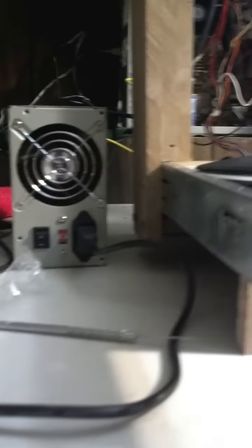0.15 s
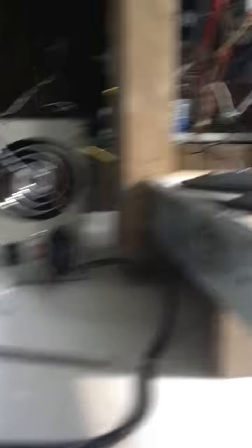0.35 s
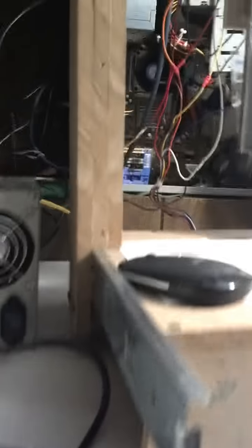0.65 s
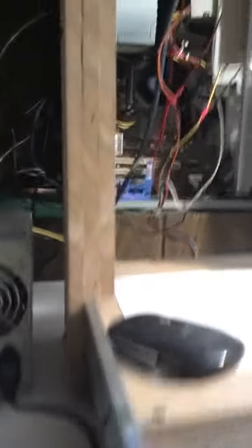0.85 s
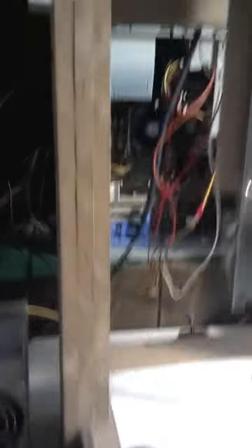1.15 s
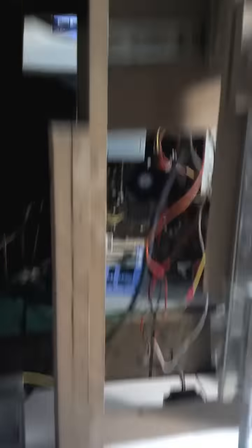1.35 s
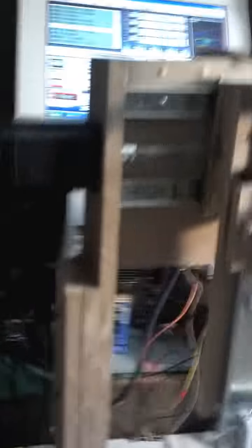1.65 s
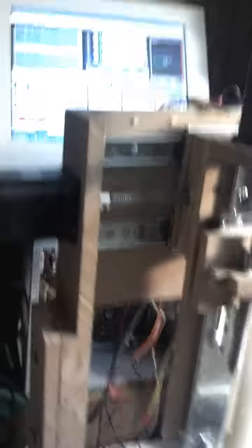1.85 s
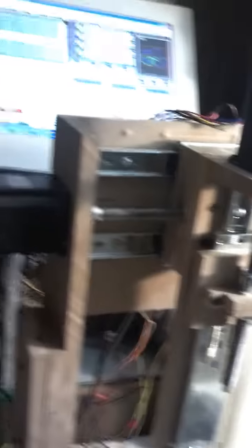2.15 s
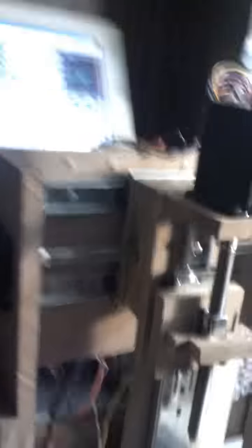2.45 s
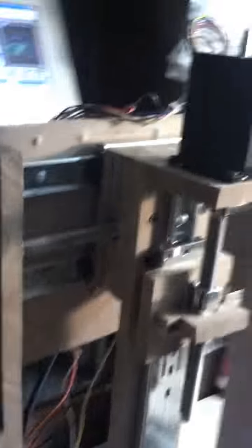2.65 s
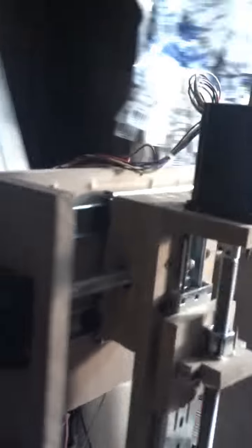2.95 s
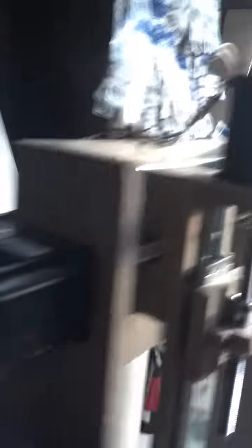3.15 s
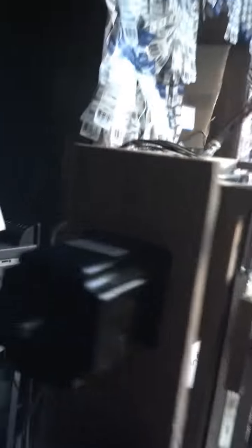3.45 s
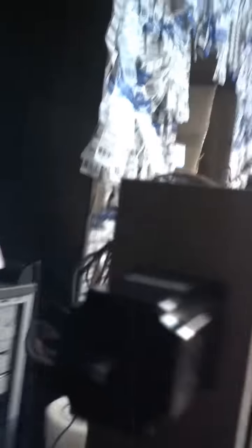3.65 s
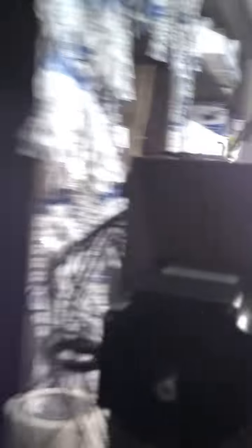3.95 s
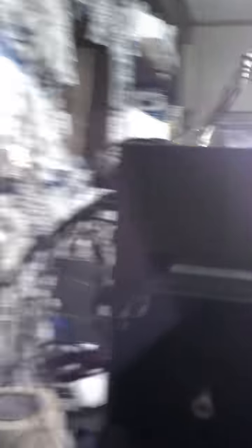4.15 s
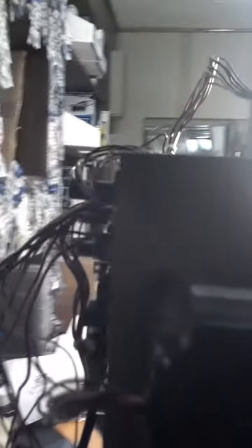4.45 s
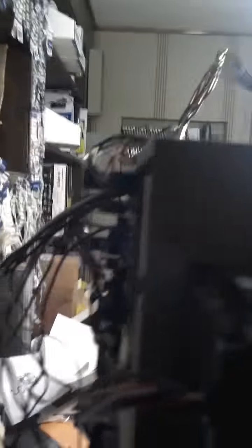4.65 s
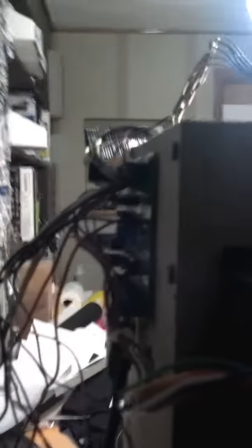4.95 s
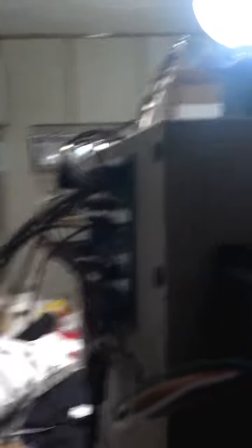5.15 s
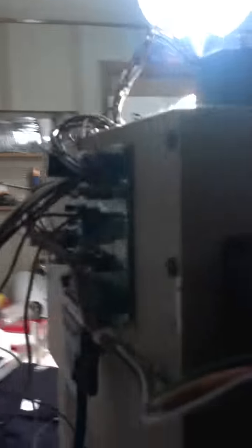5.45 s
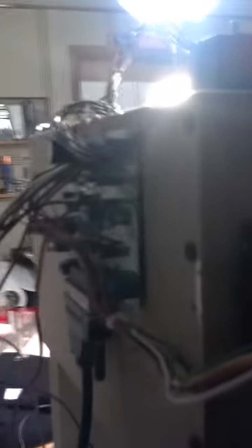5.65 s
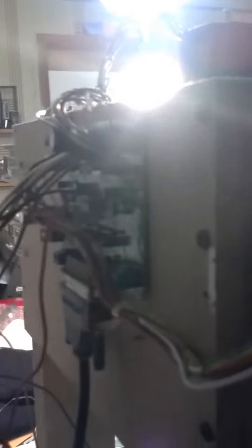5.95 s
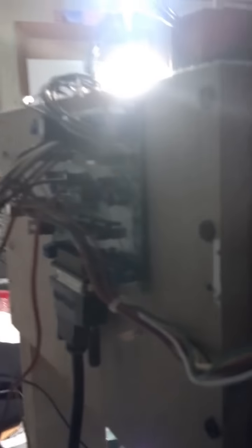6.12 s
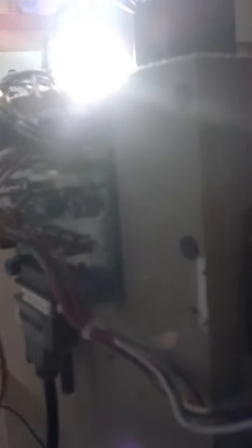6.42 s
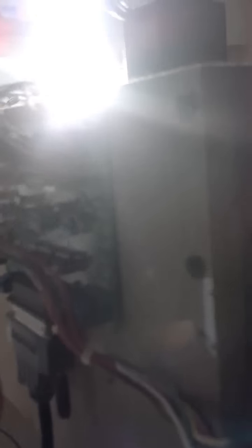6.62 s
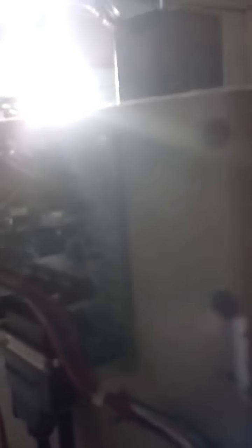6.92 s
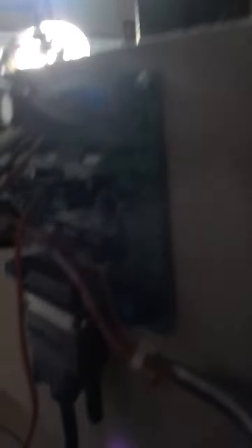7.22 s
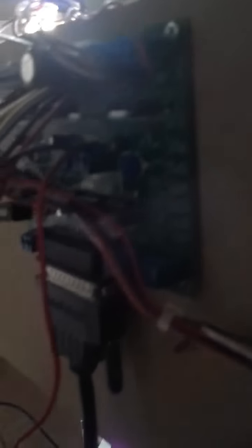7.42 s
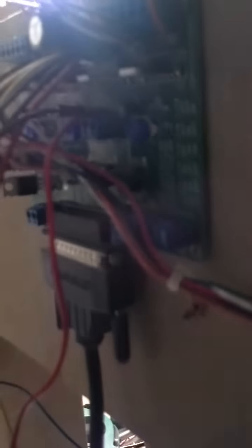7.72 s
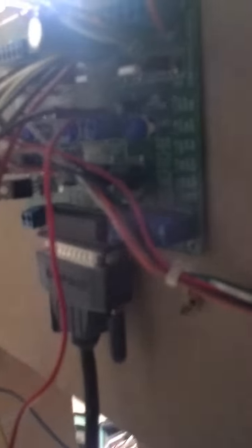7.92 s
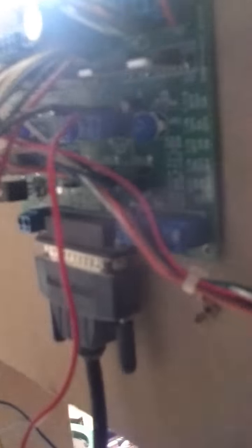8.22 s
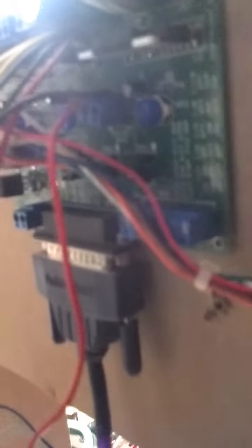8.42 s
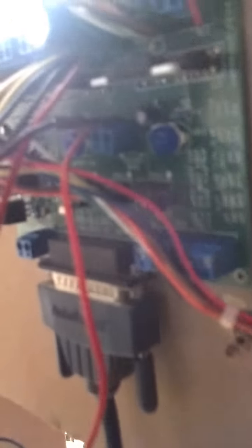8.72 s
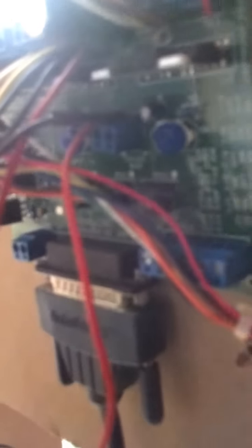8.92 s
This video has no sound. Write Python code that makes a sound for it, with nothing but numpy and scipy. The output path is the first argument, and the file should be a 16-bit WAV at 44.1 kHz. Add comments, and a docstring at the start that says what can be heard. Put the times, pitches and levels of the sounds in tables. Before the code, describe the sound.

Stepper motors on a small wooden machine, heard near by with short, dry room reflections. One quiet steady run with gritty rubbing, then a strong rising whine, long cruise and falling slide, then a return run broken by piercing squeals near its middle. A brief whine follows, a lumpy judder, and stepped two-motor tones while fan and hiss grow louder.

```python
"""Small wooden milling machine with three stepper motors, heard from a hand-held stereo camera.
X runs out and a resonance squeals; Y whines up, cruises and slows; X runs back amid more squeals, then makes
a short move out; finally Y and Z share a curved path. Motor tones are orders of the step rate, shaped by
resonances. The frame rings, rattles, shudders and judders; slides rub and scrape, X more so on a dry spot: all
shaped noise. Squeals are wavering tones near 1.8 kHz. Driver hiss and power-supply fan and hum run throughout."""
import sys
import numpy as np
from scipy import signal
from scipy.fft import rfft, irfft
from scipy.io import wavfile
from scipy.ndimage import uniform_filter1d

SR = 44100
rng = np.random.default_rng(int(sys.argv[2]) if len(sys.argv) > 2 else 0)


def output_pcm(signal):
    """Save a mono or channel-first signal as 16-bit PCM at the path in sys.argv[1].

    Samples are clipped to [-1, 1] before scaling.
    """
    pcm = np.clip(np.atleast_2d(signal).T, -1, 1) * 32767
    wavfile.write(sys.argv[1], SR, np.round(pcm).astype(np.int16))


N = 400428
TIME, FREQS = np.arange(N) / SR, np.fft.rfftfreq(N, 1 / SR)


def amp(db):
    """Decibels to gain."""
    return 10 ** (np.asarray(db) / 20)


def unit(x):
    """Scales to rms 1."""
    return x / np.sqrt(np.mean(x ** 2) + 1e-20)


def together(*gains):
    """Gain of unrelated causes sounding at once: powers add."""
    return np.sqrt(sum(gain ** 2 for gain in gains))


def curve(rows):
    """Control curve at every sample, linear between rows."""
    return np.interp(TIME, *np.transpose(rows))


def read(points, hz):
    """Reads a spectrum on a log-frequency axis."""
    point_hz, value = np.transpose(points)
    return np.interp(np.log(hz + 1), np.log(point_hz + 1), value)


def drift(band_hz, times=TIME):
    """Slow random signal of rms 1, limited to band_hz."""
    knots = signal.resample(rng.standard_normal(4096), 4096 * 8)
    return np.interp(times * band_hz * 16, np.arange(len(knots)), knots)


def noise():
    """White noise for each port."""
    return rng.standard_normal((2, N))


# lead of the right microphone port: freq_hz, lead_samples
PORT_LEAD = [(160, 10.6), (600, 1.1), (1300, 7.86), (1900, 3.8)]


def ports(turns, gain, hz):
    """A tone of rms gain at both ports, half the lead to each side."""
    half_rad = np.pi * hz * read(PORT_LEAD, hz) / SR
    phase_rad = 2 * np.pi * turns
    return np.sqrt(2) * gain * np.sin(np.array([phase_rad - half_rad, phase_rad + half_rad]))


# likeness of the two ports: freq_hz, coherence
PORT_COHERENCE = [(100, 0.96), (700, 0.6), (1300, 0.064), (2200, 0.046), (4000, 0.12)]


def coloured(pair, colour):
    """Two unrelated signals become one coloured stereo sound, alike at both ports in the bass."""
    left, other = rfft(pair) * amp(read(colour, FREQS))
    same = np.clip(read(PORT_COHERENCE, FREQS), 0, 1)
    advance = np.exp(2j * np.pi * FREQS * read(PORT_LEAD, FREQS) / SR)
    right = (same * left + np.sqrt(1 - same ** 2) * other) * advance
    return unit(irfft([left, right], N))


TOP_RATE_HZ, ACCEL_HZ_PER_S = 1279, 2558  # full steps
# single moves: start_s, stop_s, direction
X_MOVES = [(-.39, 2.13, 1), (4.855, 7.19, -1), (7.355, 7.995, 1)]
Y_MOVES = [(2.135, 4.855, 1)]


def travel(moves):
    """Signed step rate of single moves: ramp up, cruise, ramp down."""
    rate_hz = np.zeros(N)
    for start_s, stop_s, direction in moves:
        ramp_s = np.minimum(TIME - start_s, stop_s - TIME)
        rate_hz += direction * np.clip(ACCEL_HZ_PER_S * ramp_s, 0, TOP_RATE_HZ)
    return rate_hz


# path stretches: start_s, feed_z_steps_per_s, y_motor_db, z_motor_db, rattle_db
PATH = [(7.68, 2130, -20, -34, -32), (7.84, 1676, -29, -23.5, -39.5), (8.01, 2240, -21, -21.5, -40),
        (8.23, 1707, -27.5, -20, -42.5), (8.378, 1556, -15.5, -23, -40.5), (8.54, 1658, -20, -17.5, -47.5),
        (8.711, 1638, -19.5, -22, -50), (8.884, 1610, -22, -21, -38), (9.032, 1680, -26, -23.5, -50)]
# path direction: time_s, from_y_towards_z_deg
HEADING = [(7.83, 14.5), (8.01, 24), (8.23, 26.2), (8.39, 30.5), (8.54, 38.5), (8.71, 51.33),
           (8.885, 51.33), (9.09, 65.8)]
FEED_ACCEL_HZ_PER_S, Y_STEPS_PER_Z_STEP = 10700, .25  # feed in Z steps


def path_rates():
    """The feed ramps to each stretch's value; the heading shares it between Y and Z."""
    starts_s, feeds_hz = np.transpose(PATH)[:2]
    feed_hz = np.zeros(N)
    for start_s, change_hz in zip(starts_s, np.diff(feeds_hz, prepend=0)):
        ramp_hz = np.clip((TIME - start_s) * FEED_ACCEL_HZ_PER_S, 0, abs(change_hz))
        feed_hz += np.sign(change_hz) * ramp_hz
    heading_rad = np.radians(curve(HEADING))
    return Y_STEPS_PER_Z_STEP * feed_hz * np.cos(heading_rad), feed_hz * np.sin(heading_rad)


def path_loads(blend_s=0.1):
    """Y motor, Z motor and rattle levels, held through each stretch and blended between."""
    starts_s, _, *levels_db = np.transpose(PATH)
    stretch = np.maximum(np.searchsorted(starts_s, TIME) - 1, 0)
    return uniform_filter1d(np.array(levels_db)[:, stretch], round(blend_s * SR))


def motor(hz, level_db, orders, body, waver_db, jitter_turns, ripple_db=6.0, inertia_db=14,
          chatter_db=1, chatter_hz=400, grind_db=11.0):
    """Orders of the step rate, each as loud as the frame responds at its present frequency."""
    on = hz > 0
    rate_hz, on_s = hz[on], TIME[on]
    # the rotor hunts around its commanded position
    turns = (np.cumsum(hz) / SR + jitter_turns * drift(70))[on]
    slow = np.exp(-rate_hz / chatter_hz)
    gain = (amp(level_db) * np.clip(hz / 90, 0, 1))[on]
    gain = gain * amp(chatter_db * slow * drift(55)[on])  # slow steps come unevenly
    # dense high modes make the glides uneven
    grid_hz = np.arange(0, SR / 2, 110)
    ripple = ripple_db * rng.standard_normal(len(grid_hz)) * (grid_hz > 2100)
    tones = np.zeros((2, len(turns)))
    for order, order_db in orders:
        order = round(order * 64) / 64 if order < 2 else round(order)
        tone_hz = order * rate_hz
        response_db = read(body, tone_hz) + np.interp(tone_hz, grid_hz, ripple)
        response_db += waver_db * drift(9, on_s) + grind_db * slow * drift(80, on_s)
        # at speed the rotor's inertia evens out the cogging
        smoothing_db = inertia_db * (order > 3) * np.clip((rate_hz - 560) / 400, 0, 1)
        order_gain = gain * amp(order_db + response_db - smoothing_db)
        tones += ports(order * turns + rng.random(), order_gain, tone_hz)
    whole = np.zeros((2, N))
    whole[:, on] = tones
    return whole


# level as the camera passes the motor: time_s, level_db
Y_LEVEL = [(2.2, -21.5), (2.5, -25.5), (2.8, -26.5), (3.13, -20.5), (3.45, -17.5), (4, -19), (4.35, -19.5),
           (4.72, -20)]
# vibration: step_rate_multiple, relative_db
Y_ORDERS = [(.125, 0), (.25, 0), (1, -1.5), (2, -20), (3, -17), (4, -1), (6, -17), (8, -6), (12, -7.5),
            (16, -10), (20, -10)]
# frame radiation: freq_hz, response_db
Y_BODY = [(60, -39), (160, -9.5), (250, -21), (320, -18.5), (420, -21), (490, -14), (680, -8.5), (850, -14),
          (980, -7), (1160, -7.5), (1310, 2.5), (1550, -5.5), (2000, -6), (2500, -17.5), (3500, -17),
          (4100, -17), (5500, -35)]


def y_motor(hz, on_path, path_db):
    """Y stepper: orders levelled by the camera on single moves, by the stretch on the path."""
    level_db = np.where(on_path, path_db, curve(Y_LEVEL))
    return motor(hz, level_db, Y_ORDERS, Y_BODY, waver_db=1.6, jitter_turns=0.0057,
                 chatter_db=1.5, grind_db=1.5, inertia_db=15)


# level as the camera passes the motor: time_s, level_db
X_LEVEL = [(0, -44), (.12, -37), (.7, -37.5), (.85, -35), (1.2, -23.5), (1.75, -30), (5.2, -26), (7.5, -26)]
# vibration and cogging: step_rate_multiple, relative_db
X_ORDERS = [(.25, -1.5), (.5, 0), (1, 7)]
X_COGGING = [(4, 8), (8, 1), (12, -1)]
# radiation of frame and motor mount: freq_hz, response_db
X_BODY = [(120, -17), (300, -29), (430, -26), (540, -12), (690, -19), (800, -12.5), (915, 3), (1020, -8),
          (1150, -26.5), (1290, -23.5)]
X_MOUNT = [(250, -27), (550, -13), (750, -19), (910, -6), (1130, -24), (1400, -22), (1900, -28),
           (3600, -33), (5000, -47)]


def x_motor(hz):
    """X stepper: low orders leave through the frame, cogging through the mount."""
    level_db = curve(X_LEVEL)
    low_orders = motor(hz, level_db, X_ORDERS, X_BODY, waver_db=-0.6, jitter_turns=.004)
    cogging = motor(hz, level_db, X_COGGING, X_MOUNT, waver_db=-1.0, jitter_turns=0.0034, grind_db=6.5)
    return low_orders + cogging


# vibration: step_rate_multiple, relative_db
Z_ORDERS = [(.125, -9.5), (.25, -8), (.5, -16.5), (1, 3.5), (2, -0.5), (3, -6), (4, -1.5), (5, 1.5)]
# frame radiation: freq_hz, response_db
Z_BODY = [(70, -23), (110, 9), (170, -15.5), (240, -1), (330, -10), (550, -19.5), (640, -11), (720, -37),
          (820, -14), (960, -6), (1090, -7), (1145, -6), (1200, -11), (1380, 0.5), (1500, -5), (1640, -5),
          (1950, -8), (2400, -16.5), (3800, -21), (6000, -48)]


def z_motor(hz, level_db):
    """Z stepper: orders of its step rate through its own frame response."""
    return motor(hz, level_db, Z_ORDERS, Z_BODY, waver_db=2, jitter_turns=0.0077, grind_db=5, inertia_db=8)


def resonance(hz, width_hz):
    """Frequency response of one mode, gain 1 at its centre."""
    return 1 / (1 + 2j * (FREQS - hz) / width_hz)


# side tones near top speed: step_rate_multiple, relative_db
Y_SIDE_TONES = [(.75, -28), (.781, -34), (.844, -27.5), (.875, -22), (1.078, -21), (1.25, -35), (1.5, -31)]
# drive resonance just above the top rate: centre_hz, width_hz, relative_db
Y_DRIVE_MODE = (1303, 89, -15)


def cruise_buzz(hz, reach_hz=210, waver_db=2):
    """Near top speed the Y rotor swings: side tones join; uneven steps stir the drive's resonance."""
    on = hz > 0
    centre_hz, width_hz, ring_db = Y_DRIVE_MODE
    stirred = rfft(rng.standard_normal(N)) * resonance(centre_hz, width_hz) ** 2
    half_rad = np.pi * FREQS * read(PORT_LEAD, FREQS) / SR
    buzz = amp(ring_db) * unit(irfft(stirred * np.exp(1j * np.array([-half_rad, half_rad])), N))
    turns = np.cumsum(hz[on]) / SR
    for order, tone_db in Y_SIDE_TONES:
        order = round(order * 64) / 64
        gain = amp(tone_db + waver_db * drift(9, TIME[on]))
        buzz[:, on] += ports(order * turns + rng.random(), gain, order * hz[on])
    near_top = np.exp(-((hz - TOP_RATE_HZ) / reach_hz) ** 2)
    return buzz * amp(curve(Y_LEVEL)) * near_top


# ringing modes: centre_hz, width_hz, relative_db
FRAME_MODES = [(366, 13, -1.5), (674, 14, 1), (938, 49, 1.5), (1078, 13, 1.5), (1387, 38, -5.5),
               (1576, 65, -0.5), (1994, 8.3, -2.5), (3690, 47, -2)]


def frame(x):
    """The frame's modes ring along with what shakes it and beat against passing glides."""
    ringing = sum(amp(db) * resonance(hz, width_hz) for hz, width_hz, db in FRAME_MODES)
    return irfft(rfft(x) * (1 + ringing), N)


def room(x, t60_s=0.24):
    """Sparse reflections that die quickly, as in a small workshop."""
    age_s = np.arange(SR // 2) / SR
    shape = (2, len(age_s))
    sparse = rng.standard_normal(shape) * (rng.random(shape) < 2000 / SR)
    taps = sparse * (age_s > .003) * amp(-60 * age_s / t60_s)
    taps = taps + .5 * taps[::-1]
    return signal.fftconvolve(x, taps / np.linalg.norm(taps[0]), axes=1)[:, :N]


def panels(x, hz, share=.6, slow_hz=900, t60_s=.09):
    """Speed changes rack the frame: dense panel modes ring, breaking up and blurring the sweeps."""
    strain = np.clip(abs(np.gradient(hz)) * SR / ACCEL_HZ_PER_S, 0, 1) * np.exp(-(hz / slow_hz) ** 4)
    wet = np.clip(share * uniform_filter1d(strain, size=900), 0, 1)
    return np.sqrt(1 - wet ** 2) * x + room(wet * x, t60_s)


# squeals of a resonance: peak_s, level_db, rise_s, fade_db_per_s, pitch_hz
SQUEALS = [(1.959, -22.5, .008, 230, 1797), (4.947, -36, .01, 306, 1819), (5.045, -26.5, .01, 70, 1819),
           (5.875, -22.5, .025, 34, 1813), (5.8, -31, .06, 60, 1819), (5.923, -20, .007, 500, 1822),
           (6.014, -15, .004, 230, 1815), (6.175, -26.5, .0097, 111, 1809), (7.535, -31, .0032, 110, 1820)]
SQUEAL_OCTAVE_DB = -13  # against the tone, at the loudest squeal


def squeal(wander_hz=4, flutter_db=2.95, octave_flutter_db=4):
    """A resonance near 1.8 kHz rings out, at each squeal's own pitch, as X's motor tones sweep past it
    or the slide catches; hard squeals burst into the octave."""
    gains = []
    for peak_s, level_db, rise_s, fade_db_per_s, _ in SQUEALS:
        fade = amp(level_db - fade_db_per_s * np.maximum(TIME - peak_s, 0))
        gains.append(fade * np.exp(-(np.minimum(TIME - peak_s, 0) / rise_s) ** 2))
    gains = np.array(gains)
    pitches_hz = np.transpose(SQUEALS)[-1][:, None] * np.ones(N)
    hz = np.average(pitches_hz, axis=0, weights=gains + 1e-12)
    turns = np.cumsum(hz + wander_hz * drift(45)) / SR
    strength = gains.sum(0)
    gain = strength * amp(flutter_db * drift(40))
    octave = gain * strength / strength.max() * amp(SQUEAL_OCTAVE_DB + octave_flutter_db * drift(50))
    return ports(turns, gain, hz) + ports(2 * turns, octave, 2 * hz)


def shudder(hz, cruise_db, slow_db, slow_hz, settle_s=0.052):
    """A motor shakes the frame most when steps are slow and separate; it settles after a stop."""
    drive = np.clip(hz / 12, 1e-4, 1) * amp(cruise_db + slow_db * np.exp(-hz / slow_hz))
    fall = TIME / settle_s
    return np.exp(np.maximum.accumulate(np.log(drive) + fall) - fall)


RATTLE_REST_DB, RATTLE_X_DB, RATTLE_Y_DB, RATTLE_DRY_DB = -44.5, -40.5, -38.5, -46


def frame_shake(x_hz, y_hz, on_path, path_rattle_db, dry_spot):
    """Rattle drive: rest level, dry spot and the shudder of X and Y."""
    x_shake = shudder(x_hz, RATTLE_X_DB, slow_db=7.5, slow_hz=533)
    y_cruise_db = np.where(on_path, path_rattle_db, RATTLE_Y_DB)
    y_shake = shudder(y_hz, y_cruise_db, slow_db=10.5, slow_hz=470)
    return together(amp(RATTLE_REST_DB), amp(RATTLE_DRY_DB) * dry_spot, x_shake, y_shake)


# rattle spectrum: freq_hz, relative_db
RATTLE_COLOUR = [(40, -26), (80, 2), (250, 8.5), (400, 1.5), (650, -1.5), (950, -4), (1350, -8.5),
                 (2000, -10.5), (2400, -8.5), (6000, -36.5), (16000, -42.5)]


def rattle(y_hz, shake, spread_db=3, ring_s=0.01, wash=0.42, throb_db=2.5):
    """Loose parts tap about once in eight steps of the heavy Y axis, and at random besides."""
    beats = np.cumsum(y_hz) / SR / 8 + .08 * drift(60)
    step_taps = (np.diff(np.floor(beats), prepend=0) > 0) * (y_hz > 0)
    taps = step_taps | (rng.random(N) < 130 / SR)  # 130 random taps per second
    sizes = taps * amp(spread_db * np.clip(rng.standard_normal(N), -2, 2))
    bursts = unit(signal.lfilter([1], [1, -np.exp(-1 / (ring_s * SR))], sizes))
    moving = np.clip(y_hz / 200, .35, 1)
    clatter = coloured(noise() * (wash + moving * bursts), RATTLE_COLOUR)
    return clatter * shake * amp(throb_db * drift(13))


# rub spectrum: freq_hz, relative_db
RUB_COLOUR = [(500, -31), (1800, 2.5), (2700, -4), (3400, -3.5), (4100, -1), (5200, -7), (7000, -13.5),
              (16000, -20.5)]
RUB_X_DB, RUB_Y_DB, RUB_Z_DB, RUB_DRY_DB = -49, -48, -49, -44  # axes at TOP_RATE_HZ


def slides(x_hz, y_hz, z_hz, dry_spot, grain_db=1.5, speed_power=0.098):
    """Ball slides rub with a fine grain, louder with speed and on the dry spot."""
    axes = [(x_hz, RUB_X_DB), (y_hz, RUB_Y_DB), (z_hz, RUB_Z_DB)]
    gains = [amp(db) * (hz / TOP_RATE_HZ) ** speed_power for hz, db in axes]
    rub = coloured(noise() * amp(grain_db * drift(160)), RUB_COLOUR)
    return rub * together(*gains, amp(RUB_DRY_DB) * dry_spot)


# catches: start_s, length_s, dull_db, bright_db
SCRAPES = [(0.617, 0.032, -37.5, -35), (0.789, 0.064, -37, -34), (0.937, 0.066, -38, -37),
           (1.114, 0.097, -35, -36), (1.17, 0.19, -42, -38), (1.86, 0.4, -43, -46), (2.139, 0.16, -40, -48),
           (4.132, 0.031, -21.5, -37), (4.301, 0.022, -26.5, -36), (4.839, 0.064, -32.5, -63),
           (5.686, 0.28, -34.5, -43.5), (5.756, 0.048, -35, -34.5), (5.85, 0.079, -45.5, -37),
           (5.913, 0.013, -43, -19), (6.01, 0.024, -39.5, -23.5), (6.152, 0.016, -30.5, -38),
           (6.165, 0.17, -38.5, -42.5), (7.359, 0.014, -33.5, -59), (7.884, 0.048, -24, -44)]
# spectra of the two parts: freq_hz, relative_db
DULL_COLOUR = [(50, -23), (180, -17), (400, 6.5), (750, 5), (1200, -2.5), (1900, 3), (2600, -16),
               (8000, -44)]
BRIGHT_COLOUR = [(1000, -22), (2000, 4.5), (3700, 2.5), (4400, 0.5), (5500, -9), (7000, -8.5), (16000, -41)]
# one sharp click: time_s, level_db
SNAP = (2.4265, -23)


def scrapes(grain_db=3, snap_s=0.006, attack_s=0.0043):
    """Short gritty catches with a dull and a bright part, and one sharp click."""
    dull, bright = np.zeros((2, N))
    for start_s, length_s, dull_db, bright_db in SCRAPES:
        age_s = np.maximum(TIME - start_s, 0)
        shape = np.minimum(age_s / attack_s, 1) * np.exp(-(age_s / length_s) ** 2)
        dull += amp(dull_db) * shape
        bright += amp(bright_db) * shape
    grit = amp(grain_db * drift(200))
    click_s, click_db = SNAP
    snap = amp(click_db) * (TIME >= click_s) * np.exp(-abs(TIME - click_s) / snap_s) * noise()
    dull_part = dull * coloured(noise() * grit, DULL_COLOUR)
    bright_part = bright * coloured(noise() * grit, BRIGHT_COLOUR)
    return dull_part + bright_part + snap


# judders as an axis changes speed: start_s, length_s, level_db
JUDDERS = [(2.157, 0.066, -23.5), (4.838, 0.04, -24), (8.083, 0.046, -15)]
# judder spectrum: freq_hz, relative_db
JUDDER_COLOUR = [(60, -34), (130, 15), (300, 6.5), (600, -1), (1000, -10), (4000, -57)]


def judders(attack_s=0.0064, grain_db=3):
    """Short, lumpy rumbles of the whole frame."""
    gain = np.zeros(N)
    for start_s, length_s, level_db in JUDDERS:
        age_s = np.maximum(TIME - start_s, 0)
        gain += amp(level_db) * np.minimum(age_s / attack_s, 1) * np.exp(-(age_s / length_s) ** 2)
    return gain * coloured(noise() * amp(grain_db * drift(90)), JUDDER_COLOUR)


# driver hiss as the camera moves about: time_s, level_before_hiss_db
HISS_LEVEL = [(0, -54), (.72, -52), (.95, -43), (1.9, -46.5), (2.3, -57), (3.5, -54.5), (3.8, -50),
              (4.55, -43), (4.95, -53), (6.15, -55.5), (6.9, -49), (7.55, -54), (7.8, -41.5), (9, -39.5)]
# hiss spectrum: freq_hz, relative_db
HISS_COLOUR = [(7000, -15), (11500, -14.5), (12800, -6.5), (14800, -6.5), (15700, 1)]
# whistles while an axis cruises: start_s, end_s, pitch_hz, level_db
WHISTLES = [(2.63, 4.36, 9911, -65), (5.35, 6.69, 15000, -62)]


def motor_drivers(hiss_db=7.0, flicker_db=2):
    """Driver electronics: flickering high hiss and fine gated whistles."""
    out = coloured(noise(), HISS_COLOUR) * amp(hiss_db + curve(HISS_LEVEL) + flicker_db * drift(3.4))
    for start_s, end_s, hz, level_db in WHISTLES:
        gate = np.clip(np.minimum(TIME - start_s, end_s - TIME) / .02, 0, 1)
        out += ports(hz * TIME, gate * amp(level_db + 2 * drift(5.2)), hz)
    return out


# fan air spectrum: freq_hz, relative_db
FAN_COLOUR = [(70, -6.5), (115, 23.5), (170, -15), (260, -4), (500, -34), (950, -27), (1800, -12.5),
              (8000, -46.5), (16000, -23.5)]
# fan level: time_s, level_db
FAN_LEVEL = [(0, -48), (6.3, -45.5), (7.3, -38.5), (9, -34)]
# hum: pitch_hz, level_db
HUM = [(119, -43.5)]


def power_supply(hum_wander_turns=0.048):
    """Fan air as coloured noise; hum as a tone of wandering phase and level."""
    out = amp(curve(FAN_LEVEL)) * coloured(noise(), FAN_COLOUR)
    for hz, level_db in HUM:
        out += ports(hz * TIME + hum_wander_turns * drift(30), amp(level_db + 2 * drift(1.0)), hz)
    return out


DRY_AT_STEPS, DRY_WIDTH_STEPS = 1304, 190  # dry spot on the X slide, from its position at 0 s


def scene():
    """Three step rates drive the motor tones, the frame's rattle and the slides' rubbing."""
    x_velocity_hz = travel(X_MOVES)
    y_path_hz, z_hz = path_rates()
    y_move_hz = abs(travel(Y_MOVES))
    x_hz, y_hz = abs(x_velocity_hz), y_move_hz + y_path_hz
    y_path_db, z_db, path_rattle_db = path_loads()
    on_path = y_path_hz > 0
    x_steps = np.cumsum(x_velocity_hz) / SR
    dry_spot = np.exp(-((x_steps - DRY_AT_STEPS) / DRY_WIDTH_STEPS) ** 2)

    tones = frame(panels(y_motor(y_hz, on_path, y_path_db), y_hz)) + cruise_buzz(y_move_hz)
    tones += x_motor(x_hz) + z_motor(z_hz, z_db) + squeal()
    echoes = amp(-14) * room(tones)
    shake = frame_shake(x_hz, y_hz, on_path, path_rattle_db, dry_spot)
    friction = slides(x_hz, y_hz, z_hz, dry_spot) + amp(-0.5) * frame(scrapes())
    knocks = frame(rattle(y_hz, shake)) + judders()
    return tones + echoes + knocks + friction + motor_drivers() + power_supply()


EDGE_HZ = 15850


def record(dry):
    """The camera widens stereo by subtracting the other port, delayed; then bass cut and band limit."""
    late = np.pad(dry[::-1], ((0, 0), (16, 0)))[:, :N]  # 16 samples
    bass_cut = signal.butter(3, 85, "highpass", fs=SR, output="sos")
    wide = signal.sosfilt(bass_cut, (dry - late) / 2)
    band_limit = signal.firwin(511, EDGE_HZ, window=("kaiser", 9), fs=SR)
    return signal.oaconvolve(wide, band_limit[None], "same")


dry = scene()
out = record(dry)
output_pcm(out)
```